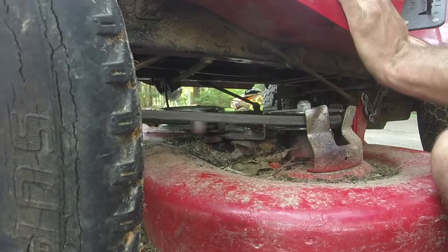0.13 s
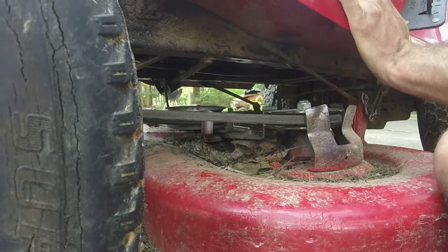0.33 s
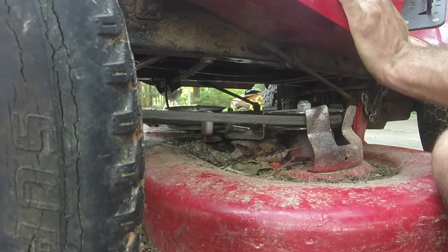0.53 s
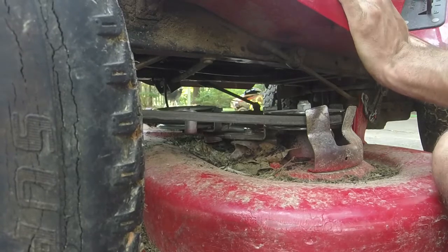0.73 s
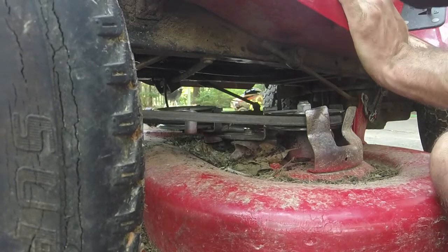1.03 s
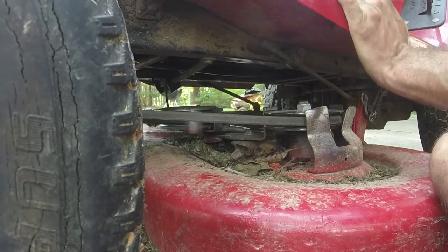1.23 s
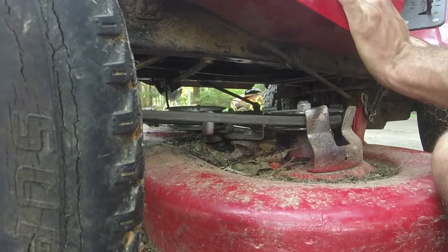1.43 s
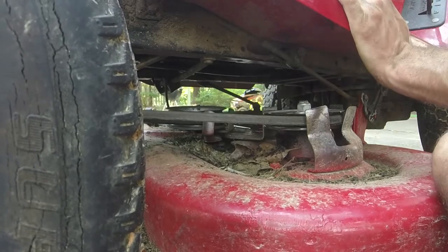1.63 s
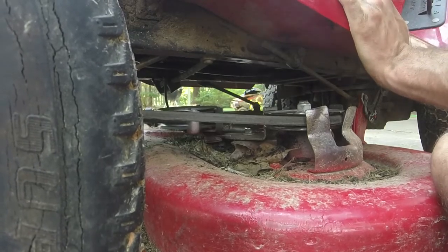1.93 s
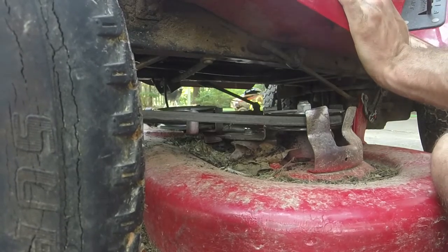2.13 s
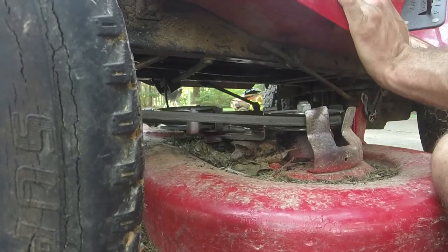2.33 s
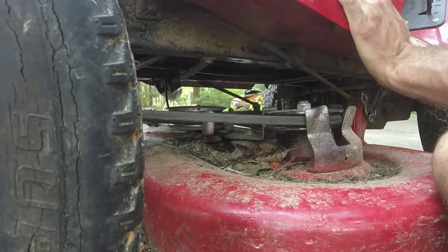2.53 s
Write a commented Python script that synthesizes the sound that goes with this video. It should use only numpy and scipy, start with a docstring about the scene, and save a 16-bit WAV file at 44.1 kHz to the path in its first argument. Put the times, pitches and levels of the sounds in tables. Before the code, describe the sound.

Close up and outdoors, a mower deck worked by hand gives three ringing metal clanks, the last two louder. Its pivots scrape and a loose pin clinks in between, while a distant engine hums low.

```python
"""Working a mower deck's lift by hand

Close by, the linkage that lifts a parked mower's deck (its blade cover) clanks three times.
Each time the slack rattles out, a steel link hits its stop, and the sheet-steel deck slams and rings.
In between, the arms scrape in their pivots, a loose pin clinks and the hanging deck bumps softly.
The metal echoes faintly outdoors, over the low hum of an engine."""
import sys
import numpy as np
from scipy import signal
from scipy.fft import rfft, irfft, next_fast_len
from scipy.io import wavfile
from scipy.ndimage import map_coordinates

SR = 44100
rng = np.random.default_rng(int(sys.argv[2]) if len(sys.argv) > 2 else 0)


def put_to_file(sound):
    """Save the sound as 16-bit audio at rate SR, in the file named by the first command-line argument."""
    columns = np.atleast_2d(sound).T  # one column per channel
    safe = np.clip(columns, -1, 1)
    whole_steps = np.round(safe * 32767)
    wavfile.write(sys.argv[1], SR, whole_steps.astype(np.int16))


N = 119070
T = np.arange(SR) / SR  # one second of time, for a single hit

# The big clanks. A fade is the time a sound takes to drop by 60 dB.
# start_s, strike_db, link_db, slam_delay_s, slam_db, deck_db, boom_hz, boom_db,
# clang_hz, clang_db, linger_hz, linger_db, linger_fade_s
CLANK_HITS = [(0.1971, -20.5, -32, .011, -23.5, -25, 601, -16.5, 2670, -30.5, 9720, -42, 0.1),
              (1.3056, -13.5, -23, 0.0044, -13.5, -23.5, 494, -13, 890, -18.5, 2795, -44, .42),
              (2.413, -13.5, -27.5, .006, -14.5, -22.5, 432.5, -7.5, 920, -25.5, 4667, -56, 0.62)]
# Tone colour of the link's strike and the deck's slam: pitch_hz, level_db
STRIKE_COLOUR = [(150, -16.5), (450, 12), (1000, -7), (2000, -24.5), (4200, -16), (5200, -18.5),
                 (10000, -19.5), (11500, -26), (15000, -33)]
SLAM_COLOUR = [(40, -51), (110, -13), (250, -14), (450, -0.5), (700, -2.5), (1100, -8.5), (1500, -12.5),
               (4200, -16.5), (6000, -22), (10000, -49.5)]
# How long each lasts, from low to high: pitch_hz, fade_s
STRIKE_FADE = [(300, 0.084), (3000, 0.13), (12000, 0.071)]
SLAM_FADE = [(100, 0.38), (400, 0.18), (1500, 0.19), (4000, 0.06)]
# The notes the link and the deck ring with: pitch_hz, level_db, fade_s
LINK_NOTES = [(1820, -3, 0.24), (2330, -7, 0.098), (2830, -22, 0.17), (3320, -14.5, 0.24),
              (3960, -3.5, 0.077), (4310, -4, 0.068)]
DECK_NOTES = [(230, 0, 0.56), (299, 1, 0.35), (422, -3.5, 0.37), (471.3, -4, .26), (519.4, -3, 0.45),
              (569, -3, 0.11), (702, -4, 0.13), (964, -5, 0.21), (1107, -3, 0.17), (1288, -6.5, 0.14),
              (1470, -14, .17), (1744, -15, 0.23)]
def clanks():
    """The link strikes and rings, then the deck slams, clangs and booms, each time at another spot."""
    boom_fade_s, boom_lag_s = 0.081, 0.00703  # the deck settles just after the slam
    out = np.zeros(N)
    for (start_s, strike_db, link_db, slam_delay_s, slam_db, deck_db, boom_hz, boom_db,
         clang_hz, clang_db, linger_hz, linger_db, linger_fade_s) in CLANK_HITS:
        add(out, start_s, amp(linger_db) * tone(linger_hz, linger_fade_s, attack_s=0.0012))
        add(out, start_s, amp(strike_db) * burst(STRIKE_COLOUR, STRIKE_FADE, attack_s=0.00016))
        add(out, start_s, amp(link_db) * ring(LINK_NOTES, attack_s=0.00025))
        slam_s = start_s + slam_delay_s
        add(out, slam_s, amp(slam_db) * burst(SLAM_COLOUR, SLAM_FADE, attack_s=0.0015))
        add(out, slam_s, amp(deck_db) * ring(DECK_NOTES, attack_s=0.0033))
        add(out, slam_s, amp(clang_db) * tone(clang_hz, boom_fade_s, attack_s=0.00076))
        add(out, slam_s + boom_lag_s, amp(boom_db) * tone(boom_hz, boom_fade_s, attack_s=0.0026))
    return out


# Knocks just before each clank: start_s, knock_db, pin_db
RATTLE_HITS = [(0.1587, -28, -50), (.1655, -26, -34), (0.178, -28, -37), (1.266, -26.5, -37),
               (1.272, -25, -35), (1.285, -24, -26.5), (2.3756, -30, -34), (2.382, -26, -32.5),
               (2.396, -21.5, -31)]
# A knock's tone colour: pitch_hz, level_db
RATTLE_COLOUR = [(60, -12), (381, -0.5), (900, -11), (2200, -20.5), (3400, -20), (6090, -25.5),
                 (10900, -26.5), (15000, -43)]
# How long it lasts: pitch_hz, fade_s
RATTLE_FADE = [(400, 0.39), (8000, 0.021)]
# The pin's notes, also heard in the clinks: pitch_hz, level_db, fade_s
PIN_NOTES = [(2230, -21.5, 0.13), (4888, -14.5, 0.051), (7020, -6, .04), (7280, -6, 0.054),
             (7760, -12, 0.067), (8400, -12, 0.044), (9400, -17, 0.084), (10700, -17.5, 0.1),
             (11150, -14, .035)]
def rattles():
    """The slack is taken up in a few dull knocks that shake the pin."""
    out = np.zeros(N)
    for start_s, knock_db, pin_db in RATTLE_HITS:
        add(out, start_s, amp(knock_db) * burst(RATTLE_COLOUR, RATTLE_FADE, attack_s=0.0023))
        add(out, start_s, amp(pin_db) * ring(PIN_NOTES, attack_s=0.0045))
    return out


# Bumps of the hanging deck: start_s, level_db, pitch_hz, fade_s
BUMP_HITS = [(0.159, -22, 135, 0.074), (.309, -23.5, 197, 0.12), (0.398, -20.5, 213, 0.094),
             (0.441, -29, 229.3, 0.2), (0.804, -18, 272.4, .07), (.817, -26.5, 185.4, 0.17),
             (0.847, -30, 284, 0.14), (0.956, -36, 189.5, 0.74), (1.097, -21.5, 296.5, 0.15),
             (1.1, -26, 114, 0.13), (1.185, -33.5, 298.4, 0.62), (1.414, -21.5, 236.7, .1),
             (1.469, -30.5, 121, 0.14), (1.882, -25.5, 305.7, 0.21), (1.947, -30.5, 308.4, 0.31),
             (2.066, -40, 470, 0.22), (2.48, -22, 200, 0.097)]
# A thud's tone colour: pitch_multiple, level_db
THUD_COLOUR = [(.25, -32), (.55, -5), (1, 1), (1.5, -10), (2.2, -17), (5, -55), (12, -70)]
def bumps():
    """Soft contacts stir only the deck's low notes: a dull thud and one clear tone."""
    out = np.zeros(N)
    for start_s, level_db, pitch_hz, fade_s in BUMP_HITS:
        colour = [(multiple * pitch_hz, db) for multiple, db in THUD_COLOUR]
        thud = amp(-2) * burst(colour, [(pitch_hz, fade_s)], attack_s=0.0017)
        note = tone(pitch_hz, fade_s, attack_s=0.0013)
        add(out, start_s, amp(level_db) * (thud + note))
    return out


# Clinks of the pin: start_s, hit_db, pin_db, note_hz, note_db, bounce_delay_s, bounce_db
CLINK_HITS = [(0.386, -37.5, -34, 7290, -39, 0.011, -38.5), (1.096, -30.5, -39.5, 5580, -33.5, 0.0086, -29),
              (1.1835, -36.5, -57, 1700, -35, .0043, -53), (1.464, -39.5, -46, 11150, -56.5, .007, -38.5)]
# A clink's tone colour: pitch_hz, level_db
CLINK_COLOUR = [(200, 5.5), (550, 13), (900, -3.5), (2600, -7.5), (3400, 0), (6000, -8.5), (9000, -13),
                (12000, -29), (15000, -24)]
# How long it lasts: pitch_hz, fade_s
CLINK_FADE = [(500, 0.19), (4000, 0.049), (12000, 0.07)]
def clinks():
    """A loose pin hits the side of its hole and bounces once, ringing briefly both times."""
    out = np.zeros(N)
    for start_s, hit_db, pin_db, note_hz, note_db, bounce_delay_s, bounce_db in CLINK_HITS:
        for at_s, level_db in (start_s, hit_db), (start_s + bounce_delay_s, bounce_db):
            add(out, at_s, amp(level_db) * burst(CLINK_COLOUR, CLINK_FADE, attack_s=0.00057))
            pin = amp(pin_db) * ring(PIN_NOTES, attack_s=0.00035)
            note = amp(note_db) * tone(note_hz, fade_s=0.033, attack_s=0.0014)
            add(out, at_s, amp(level_db - hit_db) * (pin + note))
    return out


# How the scraping swells and falls, one list per stroke: time_s, relative_body_db, relative_grit_db
SCRAPE_STROKES = [
    [(0.55, -76, -85), (0.58, -37, -54), (0.646, -43, -47), (0.684, -31.5, -41), (0.786, -34.5, -43.5),
     (0.804, -35, -53), (0.88, -38, -55), (0.924, -43, -63), (0.986, -34, -59), (1.08, -50, -59)],
    [(1.8, -81, -82), (1.82, -37, -53), (1.87, -42, -51.5), (1.886, -40, -50), (1.948, -30.5, -39),
     (1.974, -34, -41.5), (2.004, -37.5, -36), (2.02, -37, -48), (2.08, -41, -48), (2.2, -59, -71)],
]
# Tone colour of its low body and its bright grit: pitch_hz, level_db
BODY_COLOUR = [(60, -19), (110, -48), (230, 3), (310, -1.5), (380, -4), (490, 1.5), (570, -10), (700, -10),
               (1500, -24), (3000, -68)]
GRIT_COLOUR = [(600, 12), (1100, 8.5), (1800, 9), (3300, 4.5), (5000, -6), (9000, -16.5), (15000, -63)]
def scrape():
    """Dry pivots slip in many tiny jerks that stir the deck."""
    t = np.arange(N) / SR
    body_gain, grit_gain = np.zeros(N), np.zeros(N)
    for stroke in SCRAPE_STROKES:
        time_s, body_db, grit_db = np.transpose(stroke)
        moving = (t > time_s[0]) & (t < time_s[-1])
        body_gain += amp(np.interp(t, time_s, body_db)) * moving
        grit_gain += amp(np.interp(t, time_s, grit_db)) * moving
    body = amp(-3) * coloured(grains(per_s=2500), BODY_COLOUR)
    grit = amp(-5.5) * coloured(steel(grains(per_s=5000)), GRIT_COLOUR)
    return body_gain * body + grit_gain * grit


# Ticks of the joints: start_s, click_db, pitch_hz, note_db
TICK_HITS = [(0.108, -48.5, 7270, -54), (0.307, -37, 901, -49), (0.571, -46.5, 2420, -53),
             (0.683, -36.5, 5560, -50), (0.7735, -48.5, 8500, -69), (0.829, -48.5, 9300, -52),
             (.847, -59, 8900, -50), (0.851, -43, 1673, -43.5), (0.955, -48.5, 3320, -52),
             (1.2425, -45, 7050, -59), (1.814, -44.5, 1133, -48), (1.88, -49, 715, -44.5),
             (1.9098, -44.5, 7230, -48), (1.944, -39.5, 9170, -45), (2.069, -51.5, 11800, -57),
             (2.338, -49, 10400, -62)]
# A tick's tone colour: pitch_multiple, level_db
TICK_COLOUR = [(.1, 1.5), (.5, -4), (1, -3.5), (1.6, -15), (4, -36)]
# How long it lasts: pitch_hz, fade_s
TICK_FADE = [(1000, 0.21), (10000, 0.079)]
def ticks():
    """The joints tick lightly: a click and one note, which dies sooner the higher it is."""
    ring_cycles = 270
    out = np.zeros(N)
    for start_s, click_db, pitch_hz, note_db in TICK_HITS:
        colour = [(multiple * pitch_hz, db) for multiple, db in TICK_COLOUR]
        add(out, start_s, amp(click_db) * burst(colour, TICK_FADE, attack_s=0.00089))
        add(out, start_s, amp(note_db) * tone(pitch_hz, ring_cycles / pitch_hz, attack_s=0.0027))
    return out


# Pitches the linkage favours in every contact: pitch_hz, boost_db
STEEL_PEAKS = [(1010, 4), (1150, 3), (1845, 6), (2335, 7), (2790, 2.5), (4000, 1.5), (4360, 3.5),
               (8950, 7.5), (10020, 3), (13250, 6)]
def steel(x):
    """The linkage boosts narrow bands around its own pitches; the result has an average level of 1."""
    def boost(hz):
        # each peak's half width is 9 Hz plus 0.4% of its pitch
        return amp(sum(db / (1 + ((hz - peak) / (9 + 0.004 * peak)) ** 2) for peak, db in STEEL_PEAKS))
    return unit(filtered(x, boost))


# The echo's tone colour: pitch_hz, level_db
ECHO_COLOUR = [(100, 16), (400, -1), (3000, -15), (6000, -7.5), (14000, 0)]
# How long it lasts: pitch_hz, fade_s
ECHO_FADE = [(200, 0.43), (3000, 0.68), (10000, 0.21)]
def echo(x):
    """The yard sends each sound back as a short, smooth tail."""
    tail = burst(ECHO_COLOUR, ECHO_FADE, attack_s=0.03)
    return signal.fftconvolve(x, tail / np.linalg.norm(tail))[:N]


# The engine's low notes: pitch_hz, level_db
ENGINE_NOTES = [(123.8, -55), (161.5, -52.5), (220.7, -57.5)]
def engine():
    """An engine drones some way off, each note wavering a little in level and pitch."""
    t = np.arange(N) / SR
    out = np.zeros(N)
    for pitch_hz, level_db in ENGINE_NOTES:
        gain = amp(level_db + 2.7 * wobble(per_s=6.82))
        phase = 2 * np.pi * pitch_hz * t + 0.75 * wobble(per_s=5.93)
        out += gain * np.sqrt(2) * np.sin(phase)
    return out


# Tone colour of the outdoor air: pitch_hz, level_db
AIR_COLOUR = [(12, -35), (20, -15), (80, -7.5), (166, -5), (191, -12.5), (600, -17), (746, -24),
              (1820, -31), (15500, -54)]
def air():
    """The open air is a low, almost steady rush."""
    return amp(-47.5 + 0.27 * wobble(per_s=3.46)) * coloured(rng.standard_normal(N), AIR_COLOUR)


def tone(hz, fade_s, attack_s):
    """One note of a struck part: it builds over attack_s, then dies away."""
    return np.sin(2 * np.pi * hz * T) * np.exp(-np.log(1000) * T / fade_s) * (1 - np.exp(-T / attack_s))


def ring(notes, attack_s):
    """A part rings with several notes at once, in a slightly different mix at every blow."""
    chance = rng.standard_normal((len(notes), 2))
    return sum(np.sign(side) * amp(db + 2 * strength) * tone(hz, fade_s, attack_s)
               for (hz, db, fade_s), (strength, side) in zip(notes, chance))


def burst(colour, fades, attack_s):
    """Countless close notes struck at once blur into noise, each band dying at its own speed."""
    noise = coloured(steel(rng.standard_normal(SR // 2)), colour)
    hz, t, bands = signal.stft(noise, SR, nperseg=128)
    decay = np.exp(-np.log(1000) * t / along(fades, hz)[:, None])
    hit = signal.istft(bands * decay, SR)[1]
    return np.pad(hit, (0, SR - len(hit))) * (1 - np.exp(-T / attack_s))


def grains(per_s):
    """Tiny contacts at random moments."""
    return (rng.random(N) < per_s / SR) * rng.standard_normal(N)


def wobble(per_s):
    """A smooth curve through per_s random values a second."""
    return map_coordinates(rng.standard_normal(1024), [np.arange(N) * per_s / SR], mode="wrap")


def coloured(x, colour):
    """Give x a tone colour and an average level of 1."""
    return unit(filtered(x, lambda hz: amp(along(colour, hz))))


def filtered(x, gain_at):
    """Turn each frequency in x up or down by gain_at(hz)."""
    size = next_fast_len(len(x) + 8192)
    hz = np.fft.rfftfreq(size, 1 / SR)
    return irfft(rfft(x, size) * gain_at(hz), size)[:len(x)]


def along(points, hz):
    """Read between the rows of a (pitch_hz, value) table, with octaves evenly spaced."""
    pitches, values = np.transpose(points)
    return np.interp(np.log(hz + 1e-6), np.log(pitches), values)


def amp(db):
    """Turn decibels into a gain."""
    return 10 ** (np.asarray(db) / 20)


def unit(x):
    """Scale x to an average (rms) level of 1."""
    return x / np.sqrt(np.mean(x ** 2) + 1e-20)


def add(out, start_s, x):
    """Mix x into out from start_s on."""
    i = max(round(start_s * SR), 0)
    out[i:i + len(x)] += x[:N - i]


def scene():
    """The linkage, its faint echo, the engine and the air, in one channel."""
    metal = rattles() + clanks() + clinks() + ticks() + bumps() + scrape()
    return (metal + amp(-19.5) * echo(metal) + engine() + air())[None]


def record(dry):
    """Cut the very highest treble, above 15500 Hz."""
    return np.array([filtered(x, lambda hz: hz < 15500) for x in dry])


dry = scene()
out = record(dry)
put_to_file(out)
```